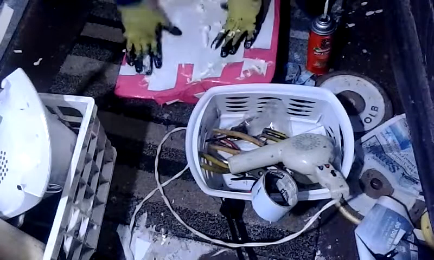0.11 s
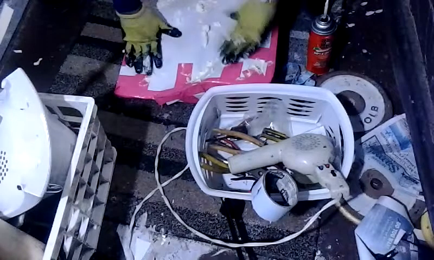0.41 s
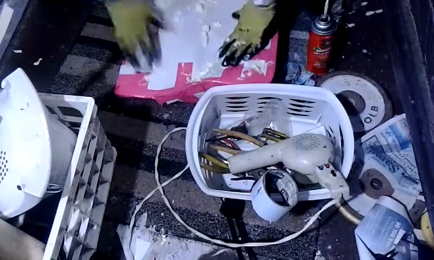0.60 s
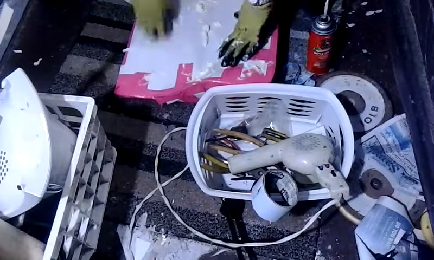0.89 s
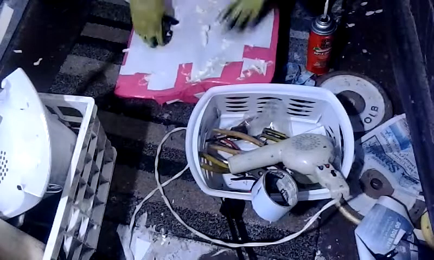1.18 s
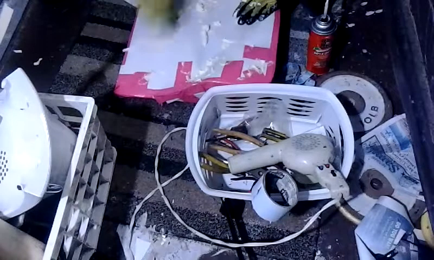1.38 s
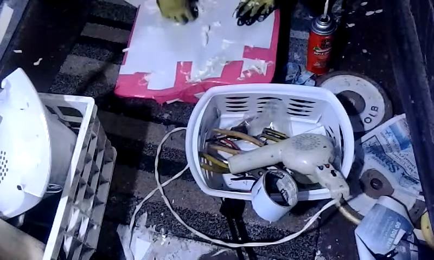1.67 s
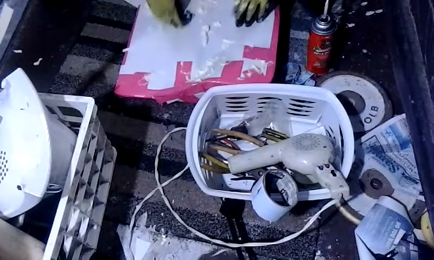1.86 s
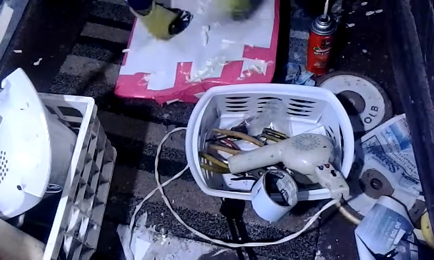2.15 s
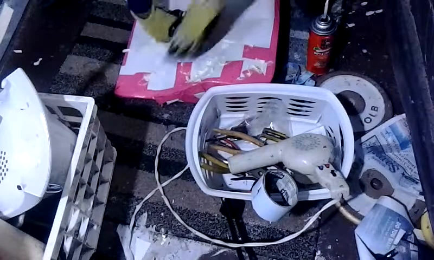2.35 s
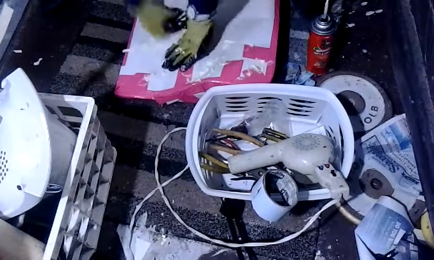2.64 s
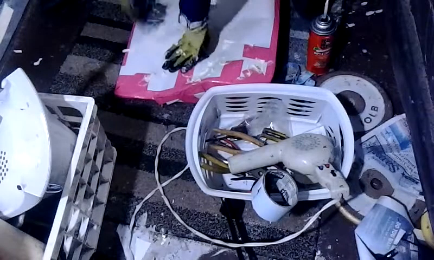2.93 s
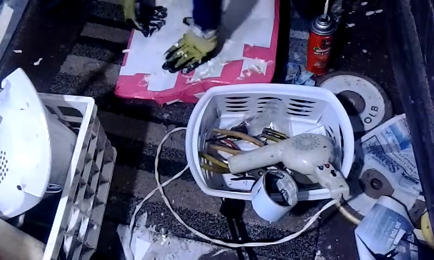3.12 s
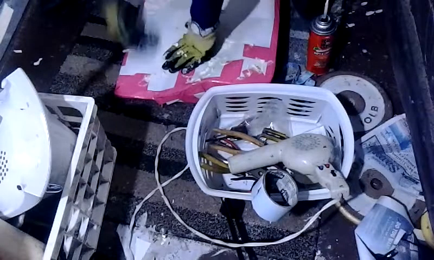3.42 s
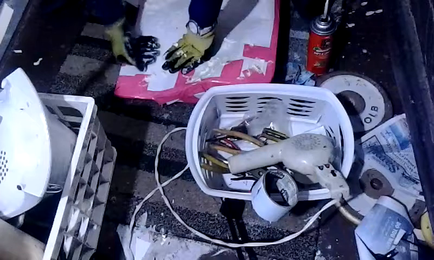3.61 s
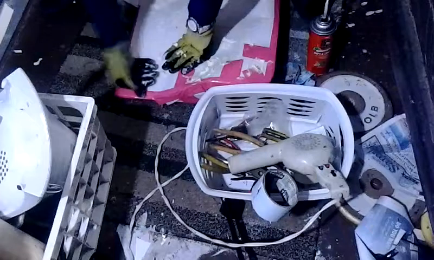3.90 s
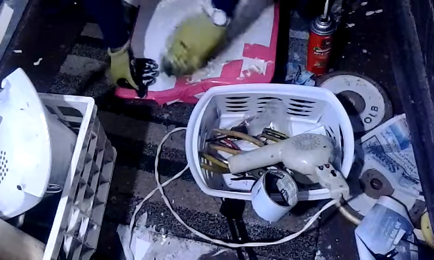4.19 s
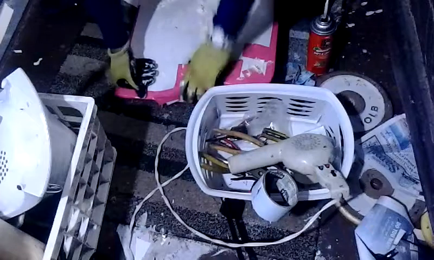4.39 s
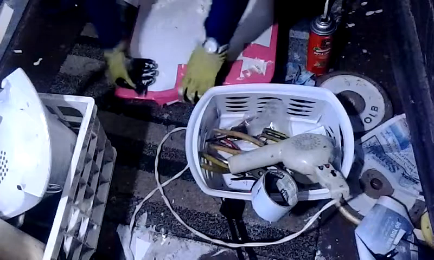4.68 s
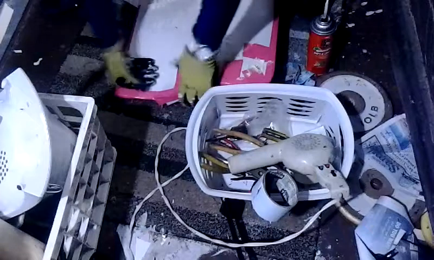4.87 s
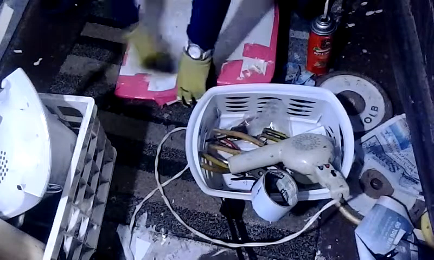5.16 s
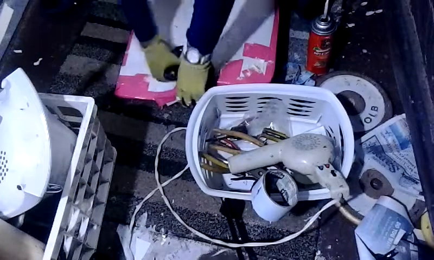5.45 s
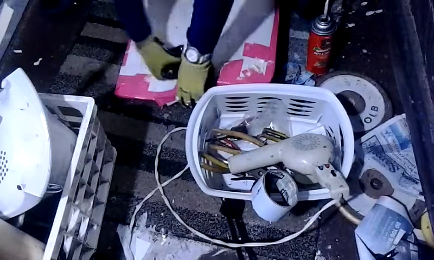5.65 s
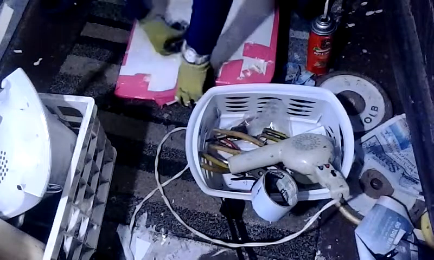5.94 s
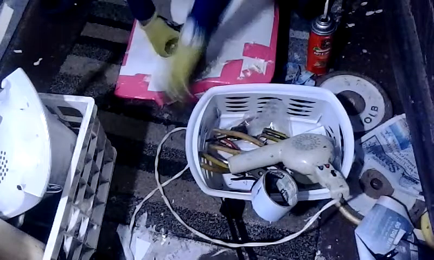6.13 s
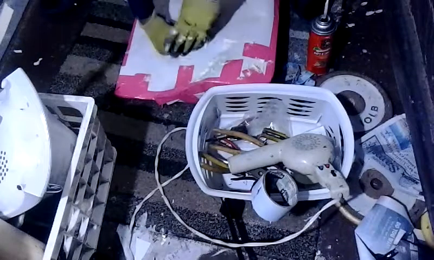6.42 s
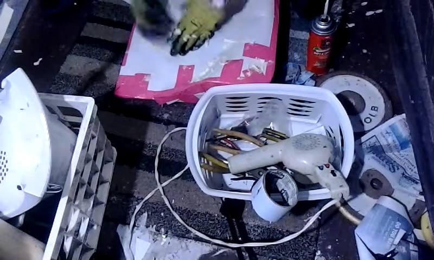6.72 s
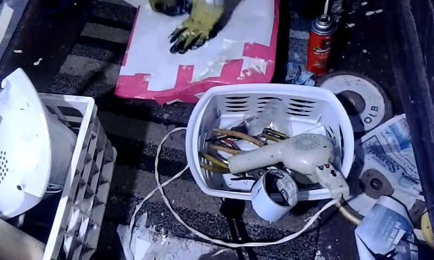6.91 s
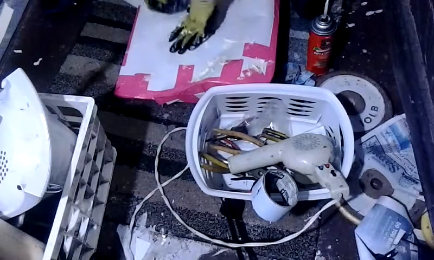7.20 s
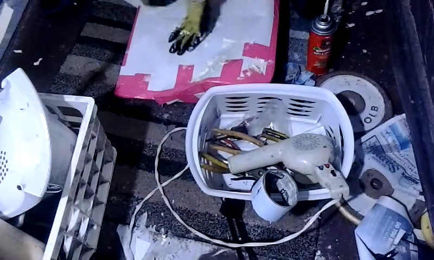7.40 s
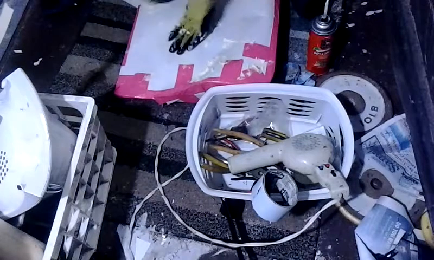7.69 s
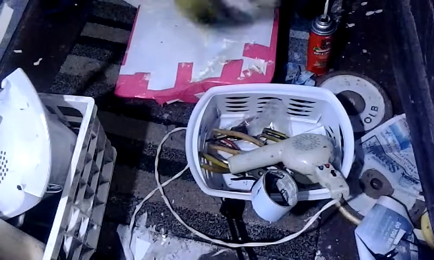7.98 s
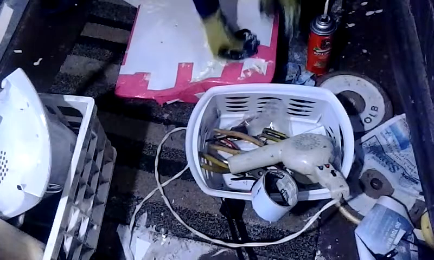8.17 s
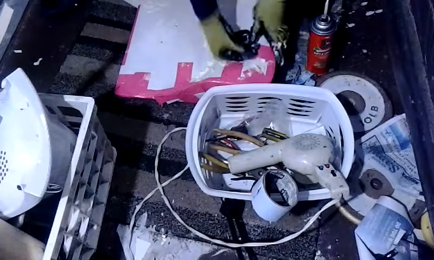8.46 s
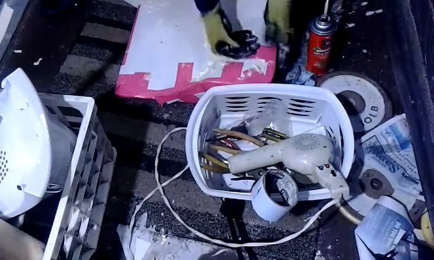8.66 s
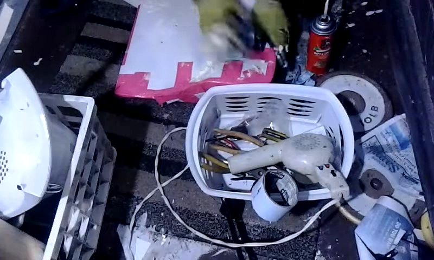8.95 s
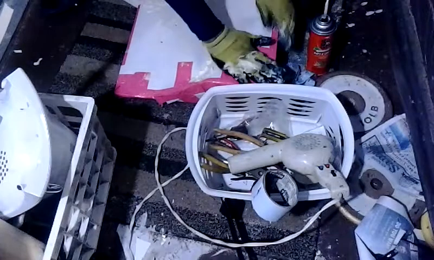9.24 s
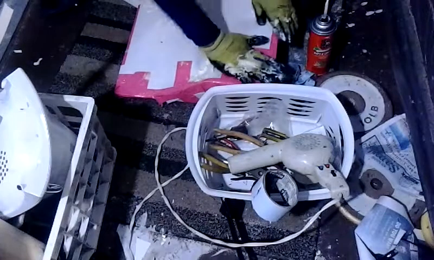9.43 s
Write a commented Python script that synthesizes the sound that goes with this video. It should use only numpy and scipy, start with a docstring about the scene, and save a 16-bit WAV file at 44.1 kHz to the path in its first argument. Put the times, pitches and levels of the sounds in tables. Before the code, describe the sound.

Gloved hands work on a taped sheet lying on a hollow board, heard very close in a small, fairly dry room. Irregular knocks, dull and woody, carry soft low pushes, papery slaps and trailing finger taps. A hard pat lands at 0.2 s, another at 0.95 with a crisp tape crackle and short skids around 1.0. Lighter uneven patting and creaking follow, then strong hits at 2.5 and 2.95. From 3.3 to 4.2 the presses are softer; 4.2 to 5.2 is nearly empty, with faint glove drags and a few weak touches. Pats thicken from 5.3, with a loud one at 6.4, a crackling one at 6.95 and a quick run from 7.2 to 7.8 with rubbing skids. After 8 s mostly quiet touches remain, with moderate taps at 8.9 and 9.13 and small scrapes until about 9.5. Low rumble, soft hiss and a faint low hum continue throughout.

```python
"""Gloved hands on a taped sheet

Gloved hands pat and press a taped sheet lying on a hollow board, close to a microphone.
Each pat is a short knock, a low push and a paper slap, made of dying swings and rattling grains.
Bursts of tiny clicks make the tape crackle; coloured grains make the gloves drag and skid and the sheet creak.
Ringing board modes and a noise tail for a small room smear it all.
Low rumble and hiss of shaped noise and a faint sine hum lie beneath."""
import sys
import numpy as np
from scipy import signal
from scipy.fft import rfft, irfft
from scipy.io import wavfile

SR = 44100
rng = np.random.default_rng(int(sys.argv[2]) if len(sys.argv) > 2 else 0)


def transcribe(u):
    """Save the signal u as a 16-bit wav file named by the first command-line argument.

    u: samples, shape (n,) or (channels, n), limited to [-1, 1]; the rate is SR.
    q: integer samples, one column per channel.
    """
    v = np.clip(np.atleast_2d(u).T, -1, 1)
    q = np.round(v * 32767).astype(np.int16)
    wavfile.write(sys.argv[1], SR, q)


def boost_factor(decibels):
    """Convert a level in decibels to a linear amplitude factor."""
    exponent = np.asarray(decibels, float) / 20
    return 10 ** exponent


N = 422478  # length [samples]

# pats of the hands: (time [s], knock level [dB], knock pitch [Hz],
# low push re knock [dB], paper slap re knock [dB])
HAND_PATS = [(0.049, -30, 530, -6, -6), (0.063, -19, 560, -5, -11.5), (0.175, -31, 530, 5, -5),
             (0.196, -6, 620, -48, -11), (0.408, -37, 460, -10, -15), (0.445, -31, 686, -7, -23),
             (0.5, -31, 480, -1, -15), (0.562, -36, 520, -4, -17), (0.618, -22.5, 575, -7.5, -12),
             (0.772, -16.5, 500, -9, -10.5), (0.944, -8, 626, -18, -12), (1.032, -17.5, 516, -6, -10.5),
             (1.077, -23.5, 1140, -6.5, -10), (1.265, -28, 604, -9, -10), (1.359, -16, 534, -11, -16.5),
             (1.507, -43, 450, 0, -17), (1.539, -19, 420, -6.5, -12.5), (1.689, -20, 525, -15, -13),
             (1.722, -24, 790, -3.5, -7), (1.835, -29, 606, -12, -14), (1.871, -30, 510, -5, -13),
             (1.937, -29, 450, -4.5, -10), (1.999, -27.5, 1050, -13, -15), (2.114, -29, 916, -22, -10.5),
             (2.176, -18.5, 590, -14, -13), (2.223, -15, 540, -19, -8), (2.279, -27, 653, -2.5, -23),
             (2.435, -36.5, 412, -1, -8), (2.461, -25.5, 440, -5, -7.5), (2.48, -19.5, 540, -12, -37),
             (2.53, -7, 673, -38, -15), (2.864, -28, 415, -1.5, -17), (2.954, -6, 660, -10, -8.5),
             (2.993, -13.5, 600, -35, -16), (3.095, -13.5, 505, -14, -16), (3.303, -27, 535, -8.5, -12.5),
             (3.489, -23.5, 533, -2.5, -10), (3.534, -29, 570, -0.5, -19), (3.703, -31.5, 435, -1, -15.5),
             (3.847, -27.5, 594, 3, -10), (3.994, -24, 700, 5, -35), (4.126, -23, 480, 0.5, -13),
             (4.158, -35, 440, -7, -26), (4.796, -31.5, 575, 0.5, -22), (5.004, -35, 442, -1, -9),
             (5.284, -16.5, 560, 1, -16), (5.343, -15, 1040, -4, -11), (5.512, -23, 414, -27, -43),
             (5.598, -26, 550, -6, -17.5), (5.709, -12.5, 518, -9, -15.5), (5.822, -20.5, 573, -4.5, -19),
             (5.874, -22, 535, -7.5, -18), (5.955, -15, 595, -5.5, -13), (6.008, -17.5, 654, -30, -6.5),
             (6.182, -31.5, 430, -0.5, -12.5), (6.236, -25.5, 646, -5.5, -13), (6.267, -30, 564, 3, -30),
             (6.402, -7, 564, -10, -9.5), (6.453, -21, 716, -27, -6.5), (6.656, -32.5, 700, -5, -10),
             (6.778, -35, 530, -7, -4.5), (6.895, -34, 383, 0, -9), (6.941, -10.5, 640, -4.5, -9.5),
             (7.078, -29.5, 1120, -28, -11), (7.19, -29.5, 680, -8, -12), (7.245, -30, 620, 7.5, -14),
             (7.377, -18.5, 580, 0, -17), (7.428, -17.5, 556, -15, -21), (7.478, -17, 760, -3, -27),
             (7.569, -20.5, 660, -6.5, -21), (7.667, -32, 640, -30, -15), (7.707, -10.5, 756, -6.5, -14),
             (7.765, -27.5, 413, 5, -8), (7.786, -26, 603, 6, -4.5), (7.818, -18, 483, -2.5, -11),
             (8.138, -36.5, 535, 5.5, -3), (8.235, -41, 420, 4, -20), (8.262, -33, 465, -3, -24),
             (8.307, -25.5, 590, -15, -14), (8.533, -42, 564, -5, -10), (8.572, -39, 507, 2, -11),
             (8.646, -31.5, 605, -15, -37), (8.829, -37, 398, -2, -10), (8.858, -34.5, 514, -4, -15),
             (8.904, -18, 540, -36, -16), (9.107, -33, 387, -13, -15), (9.131, -19, 554, -4, -19),
             (9.181, -25.5, 435, -11, -15), (9.269, -31, 450, -2, -28), (9.352, -27, 475, -3.5, -17),
             (9.408, -32, 536, -1.5, -7), (9.487, -34, 485, -3, -22)]


def unit(x):
    """Scale to rms 1."""
    return x / np.sqrt(np.mean(x ** 2))


def fade(t, t60):
    """Exponential fall of 60 dB in t60 seconds."""
    return np.exp(-np.log(1000) * t / t60)


def band(x, lo_hz, hi_hz):
    """Gentle band-pass."""
    return signal.sosfilt(signal.butter(2, [lo_hz, hi_hz], "bandpass", fs=SR, output="sos"), x)


def colour(x, points):
    """Shape a spectrum by (Hz, dB) points joined on a log-frequency axis, then scale to rms 1."""
    hz, db = np.transpose(points)
    f = np.maximum(np.arange(len(x) // 2 + 1) * SR / len(x), 1)
    gain = boost_factor(np.interp(np.log(f), np.log(hz), db))
    return unit(irfft(rfft(x) * gain, len(x)))


def grains(rate, spread_db):
    """Sparse clicks, rate per second on average, of either sign and scattered size; rms 1."""
    when = rng.random(N)
    size = rng.exponential(size=N)
    sign = rng.standard_normal(N)
    return unit((when < rate / SR) * boost_factor(spread_db * np.minimum(size, 2)) * sign)


def swing(t, hz, turns):
    """A push that swings and dies: a sine whose envelope peaks at 1 after turns / 2 cycles."""
    x = t * hz * 2 / turns
    return np.sin(2 * np.pi * hz * t) * x * np.exp(1 - x)


def swell(t, peak_s):
    """Envelope of a rustle that jumps up, peaks at peak_s and trails away."""
    return (t / peak_s) ** 0.25 * np.exp((1 - t / peak_s) / 4)


def background():
    """Rumble and microphone hiss as one shaped noise, plus a faint hum as a steady sine."""
    # rumble and hiss colour: (frequency [Hz], relative level [dB])
    floor_colour = [(15, -1.5), (27, 7.5), (42, 10), (60, -6), (100, 4), (200, -11.5), (600, -5),
                    (1200, -13.5), (2400, -15.5), (5400, -17), (8000, -16), (14800, -18), (16000, -15)]
    floor_db, hum_db, hum_hz = -56, -62, 59.5  # both levels are rms
    noise = colour(rng.standard_normal(N), floor_colour)
    hum = np.sqrt(2) * np.sin(2 * np.pi * hum_hz * np.arange(N) / SR)
    return boost_factor(floor_db) * noise + boost_factor(hum_db) * hum


def drag():
    """Stick-slip clicks of the gloves, sounding through the sheet; it creaks on a while after each pat."""
    # how hard the gloves drag on the sheet: (time [s], creak level [dB])
    drag_levels = [(0.0, -54.5), (0.8, -61), (0.93, -55), (1.76, -48), (2.3, -59.5), (2.9, -58.5),
                   (3.3, -53), (3.65, -73), (4.0, -51.5), (4.6, -65), (5.3, -65), (5.87, -57), (6.35, -48),
                   (6.75, -60.5), (7.66, -51), (8.0, -68), (8.7, -63), (9.26, -53.5), (9.58, -64)]
    # creak colour: (frequency [Hz], relative level [dB])
    creak_colour = [(60, -7), (140, 0), (230, -1), (500, 1.5), (900, -4), (1500, -11), (2500, -33),
                    (5000, -30)]
    settle_db, settle_t60_s = -35, 0.88  # creak of the settling sheet, level re knock
    t = np.arange(N) / SR
    s, creak_db = np.transpose(drag_levels)
    pat_power = np.zeros(N)
    for at, knock_db, *_ in HAND_PATS:
        pat_power[int(at * SR)] = boost_factor(knock_db + settle_db) ** 2
    keep = fade(2 / SR, settle_t60_s)  # power falls twice as fast as amplitude
    settle_power = signal.lfilter([1], [1, -keep], pat_power)
    creak = colour(grains(rate=450, spread_db=3.5), creak_colour)
    drag_power = boost_factor(np.interp(t, s, creak_db)) ** 2
    return np.sqrt(drag_power + settle_power) * creak


def pats(count=5, contact_s=0.00175, slap_s=0.0045, fingers_s=0.025, fingers_db=-14):
    """Knock, push and slap of every pat as dying swings, dealt out over several spots on the sheet."""
    out = np.zeros((count, N + 8192))
    t = np.arange(4096) / SR
    spot = rng.integers(0, count, 400)
    chance = rng.random((400, 2, 3))  # lateness and pitch of three following fingers a pat
    flutter = unit(band(band(grains(rate=3000, spread_db=2.5), 580, 1730), 580, 5070))
    for k, (s, db, hz, push_db, slap_db) in enumerate(HAND_PATS):
        i = int((s + contact_s) * SR)
        # the knock is a short dying swing at the pat's listed pitch
        knock = swing(t, hz, turns=1.034)
        # the other fingers land just after, each a little differently
        for late, size in chance[k].T:
            finger_t = np.maximum(t - fingers_s * (late + 0.1532), 0)
            knock += boost_factor(fingers_db) * swing(finger_t, hz * (0.51 + 1.33 * size), turns=1.0)
        push = boost_factor(push_db) * swing(t, hz=241.0, turns=0.63)
        # the paper snaps flat, then goes on rattling a little
        snap = swing(t, hz=1415.0, turns=1.0) + boost_factor(-6.5) * swing(t, hz=2500.0, turns=0.54)
        rattle = boost_factor(-10.5) * np.roll(flutter, -i)[:len(t)] * swell(t, slap_s)
        slap = boost_factor(slap_db) * (snap + rattle)
        out[spot[k], i:i + len(t)] += boost_factor(db) * (knock + push + slap)
    return out[:, :N]


def tape():
    """Bursts of tiny clicks as glue lets go, a coarse and a fine kind."""
    # tape crackling: (time [s], level before filtering [dB], fine crackle re level [dB])
    cracks = [(0.062, -38.5, -6), (0.1954, -35.5, -34), (0.623, -43, -5), (0.775, -36.5, -7),
              (0.9434, -28.5, -10), (1.0776, -34.5, -3), (1.5399, -53, 2), (1.5668, -40, -14),
              (1.735, -35, -10), (1.997, -48, -14), (2.2243, -58, -24), (2.2782, -42, -11),
              (2.4645, -40.5, -4), (2.534, -32.5, -7.5), (2.952, -44, -30), (3.4795, -51, -4),
              (3.5, -43, -6), (3.8537, -39.5, -11), (5.288, -45, -13), (5.342, -52, -19), (5.599, -44, -11),
              (5.7109, -46.5, -6), (5.88, -45, -11), (5.9547, -36, -14), (6.0087, -38.5, -9),
              (6.2352, -47, -9), (6.4043, -34.5, -7), (6.4525, -37.5, -2.5), (6.9442, -27, -15),
              (7.3781, -49, -3), (7.3921, -47, -7), (7.431, -39.5, -9), (7.5687, -45, -7),
              (7.7094, -57, -17), (7.7926, -35.5, -18), (7.8186, -56, -18), (9.1257, -52, -4),
              (9.412, -43.5, -3)]
    coarse, fine = np.zeros(N + 8192), np.zeros(N + 8192)
    t = np.arange(8192) / SR
    for s, db, fine_db in cracks:
        i = int(s * SR)
        burst = boost_factor(db) * swell(t, peak_s=0.0042)
        coarse[i:i + len(t)] += burst
        fine[i:i + len(t)] += boost_factor(fine_db) * burst
    clicks = grains(rate=7000, spread_db=2.5)
    coarse_crackle = band(coarse[:N] * clicks, 1630, 5290)
    fine_crackle = band(band(fine[:N] * clicks, 5970, 11100), 2100, 8100)
    return coarse_crackle + fine_crackle


def slides():
    """Denser stick-slip grain while a glove skids, fading in and out at the ends."""
    # short slides of a glove over the sheet: (start [s], length [s], level [dB])
    skids = [(0.882, 0.07, -43), (0.994, 0.049, -36.5), (1.244, 0.093, -45), (2.248, 0.062, -44),
             (2.547, 0.076, -49), (3.01, 0.088, -44), (3.475, 0.047, -41), (4.092, 0.08, -47),
             (4.365, 0.067, -51), (4.447, 0.12, -54.5), (4.728, 0.055, -53), (4.958, 0.029, -51),
             (5.017, 0.13, -52), (5.307, .1, -45), (6.957, 0.088, -38.5), (7.37, 0.13, -42.5),
             (7.718, 0.15, -45.5), (8.914, 0.11, -53), (9.138, 0.083, -44), (9.302, 0.21, -58)]
    # slide colour: (frequency [Hz], relative level [dB])
    scrape_colour = [(100, -6), (250, 0), (600, 4), (1100, -4.5), (1900, -14.5), (3000, -23.5),
                     (6000, -28.5)]
    edge_s = 0.014
    t, gate = np.arange(N) / SR, np.zeros(N)
    for s, length, db in skids:
        to_nearest_end = np.minimum(t - s, s + length - t)
        gate += boost_factor(db) * np.clip(to_nearest_end / edge_s, 0, 1)
    return gate * colour(grains(rate=900, spread_db=3.0), scrape_colour)


def space(board_db, build_s):
    """Response from one spot on the sheet: direct sound, board modes, then a diffuse tail that builds up."""
    # board modes: (frequency [Hz], level re board_db [dB], t60 [s])
    board_modes = [(142.8, 1, 0.28), (221.4, -7, 0.68), (304, -1.5, 0.46), (345.5, -1.5, 0.43),
                   (393.2, -5.5, 0.43), (421.7, 1, 0.25), (510, -17.5, 0.11), (595, 8.5, 0.06),
                   (700, -29, 0.16), (814, -10, 0.25), (1003, -12, 0.16), (1304, 8, 0.14),
                   (1620, -26, 0.069)]
    # room tail: (band centre [Hz], relative level [dB], t60 [s])
    room_bands = [(122, -3.5, 0.17), (271, -3, 0.28), (534, -21.5, 0.12), (1037, -6.5, 0.21),
                  (1920, -22, 0.55), (3540, -14.5, 0.45), (8300, -25, 0.83)]
    t = np.arange(SR // 2) / SR
    out = np.zeros(len(t))
    for hz, db, t60 in board_modes:
        # every spot drives each mode with its own strength and sign
        strength = boost_factor(board_db + db + 3 * rng.standard_normal()) * rng.choice([-1, 1])
        out += strength * np.sin(2 * np.pi * hz * t) * fade(t, t60)
    for hz, db, t60 in room_bands:
        # octave-wide noise, weighted by the root of its bandwidth
        noise = unit(band(rng.standard_normal(len(t)), hz / np.sqrt(2), hz * np.sqrt(2)))
        level = boost_factor(db) * np.sqrt(hz) / SR * 20
        out += level * noise * fade(t, t60) * (1 - np.exp(-t / build_s))
    out[0] += 1  # direct sound
    return out


def scene():
    """Pats, tape, slides and drags heard through board and room, the same on both channels."""
    spots = pats()
    spots[0] += drag()
    spots[1] += tape()
    spots[2] += slides()
    near = sum(signal.fftconvolve(x, space(board_db=-55, build_s=0.0013))[:N] for x in spots)
    near = band(near, 87, 20000)  # a small sheet radiates no deep bass
    return np.tile(near + background(), (2, 1))


def roll_off(x):
    """The treble ends steeply here."""
    return signal.sosfilt(signal.butter(12, 16830, fs=SR, output="sos"), x)


def record(dry):
    """One microphone feeds both channels, plus faint treble noise that differs between them; the top is cut."""
    noise_db, top_hz = -73.5, 15800  # noise level before its band-pass
    channel_noise = boost_factor(noise_db) * band(rng.standard_normal(dry.shape), 930, 8600)
    top_cut = signal.ellip(8, 0.2, 70, top_hz, fs=SR, output="sos")
    mix = signal.sosfilt(top_cut, dry + channel_noise)
    return roll_off(mix)


dry = scene()
out = record(dry)
transcribe(out)
```